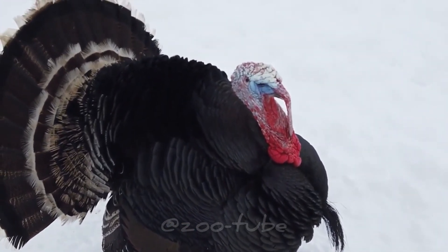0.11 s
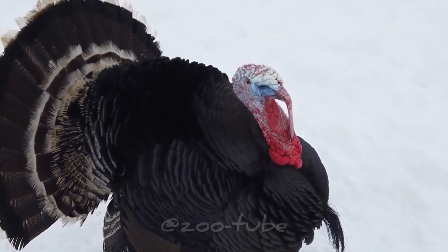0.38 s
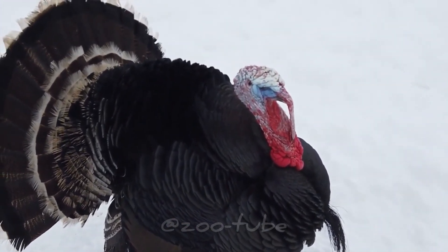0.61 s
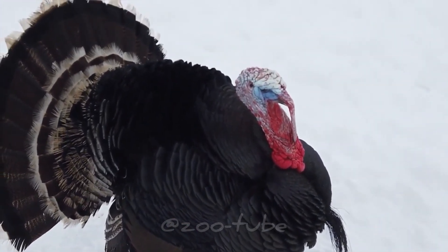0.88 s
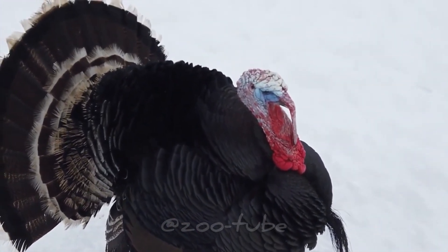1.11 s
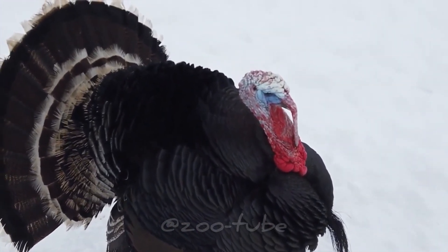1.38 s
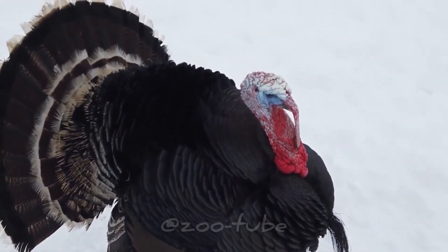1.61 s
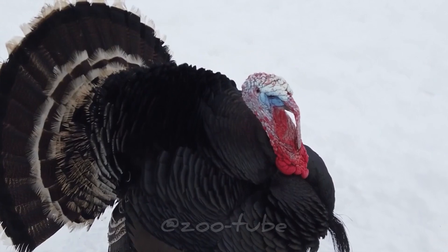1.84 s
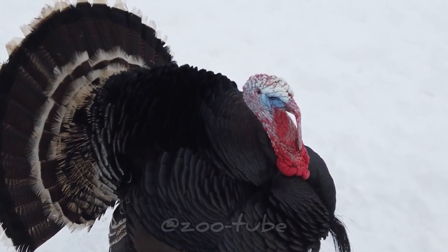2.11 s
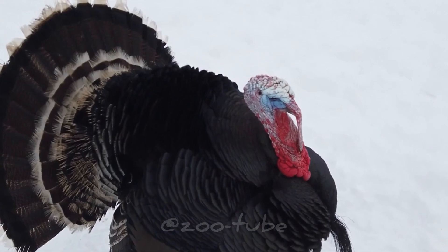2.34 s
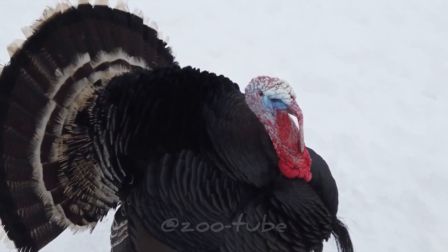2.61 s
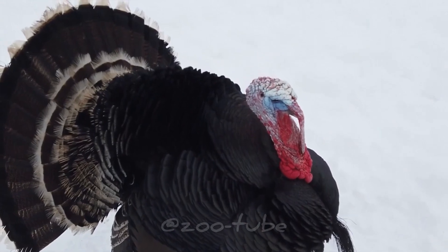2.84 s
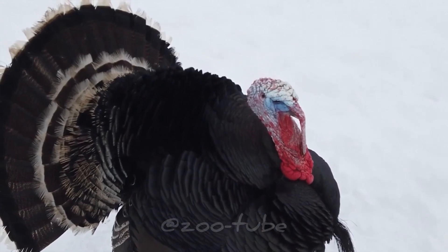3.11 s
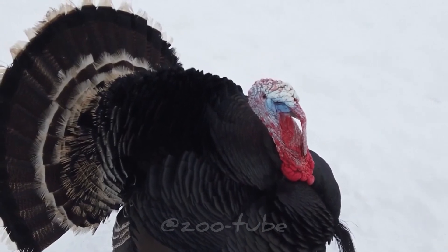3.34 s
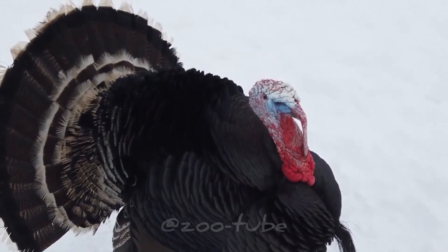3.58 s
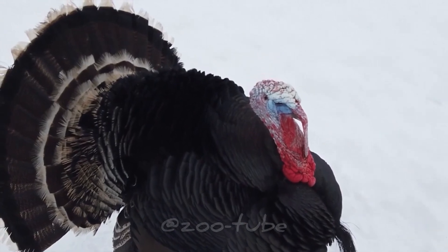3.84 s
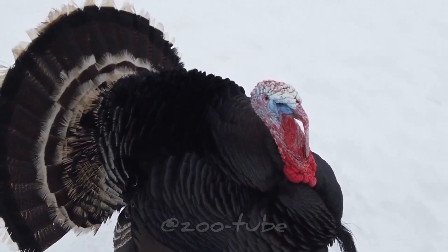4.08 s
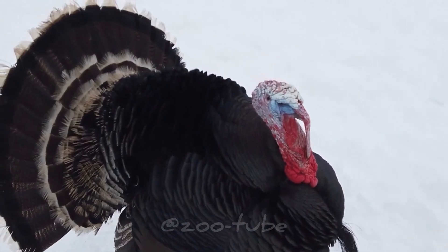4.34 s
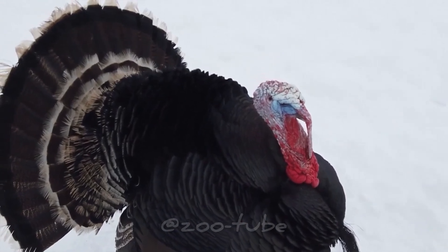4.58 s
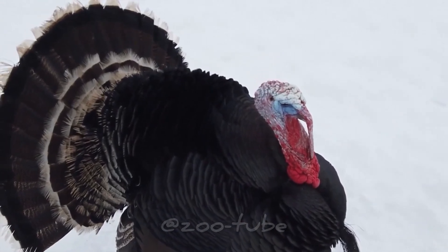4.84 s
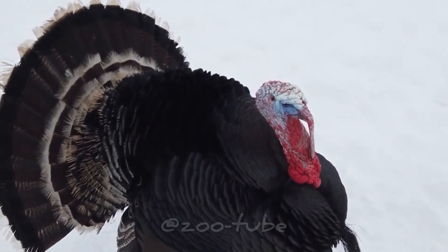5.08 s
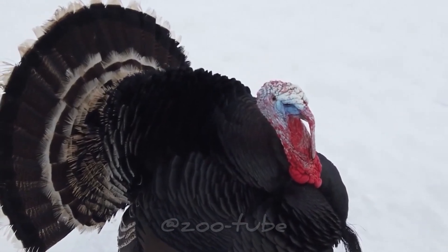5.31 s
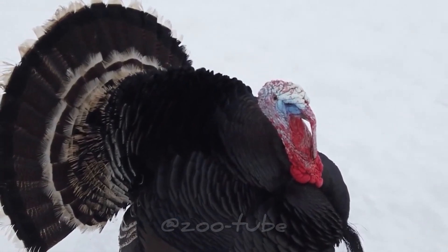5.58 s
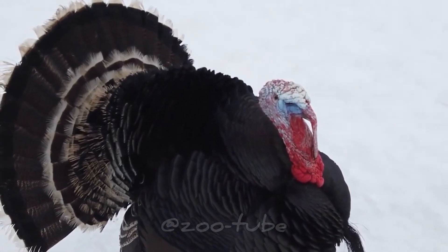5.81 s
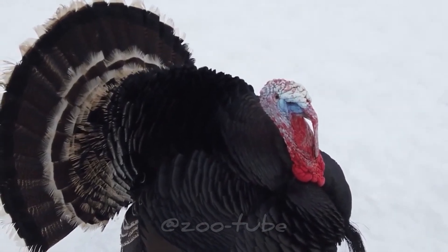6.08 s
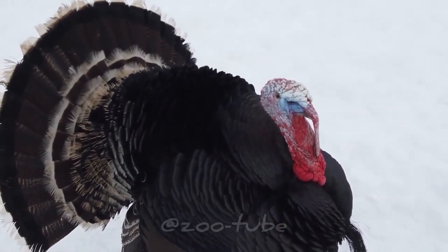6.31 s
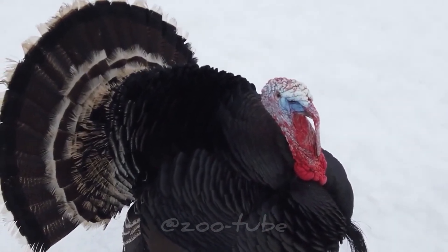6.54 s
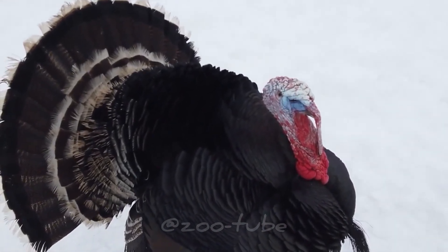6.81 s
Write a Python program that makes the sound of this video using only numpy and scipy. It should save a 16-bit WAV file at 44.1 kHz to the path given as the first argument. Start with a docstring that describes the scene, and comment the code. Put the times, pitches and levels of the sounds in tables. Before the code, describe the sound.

A calm outdoor yard with soft low rumble, light hiss and faint high air swells. From 0 to 1.3 s distant fowl mutter, with a few dull, hoarse clucks standing out. At about 1.4 s a male turkey starts weakly, then bursts into a fast, throaty, bubbling gobble from 1.55 to 2.05 s, somewhat muffled as if turned away, with thin scattered echoes. Faint peeps and far hoarse calls follow at 2.2-3 s. A pigeon's soft hollow coo rises and falls from 3.0 to 3.9 s; over it, at 3.55-4.15 s, comes a second, weaker, raspier gobble. Then quiet, until a hen's short clear peeps at 4.8-5.1 s. Tiny pigeon grunts at 5.3 and 5.7 s lead into another rising coo with faint peeps, around 5.8-6.4 s. At 6.47-6.9 s the third gobble erupts, by far the loudest and brightest, hard rattling notes closing in gulps.

```python
"""Turkeys in a snowy yard. Far fowl mutter and cluck over soft rumble and hiss, then a first gobble breaks out, duller
because the bird faces away. Far calls, peeps and a pigeon's coo follow, and a second gobble sounds during the coo.
A hen peeps and the pigeon grunts before the third gobble. Gobbles are quick runs of short notes and gulps: stacks of
sines from a two-sided voice box, plus rasping noise. Peeps and coos are near sines; the yard is shaped noise."""
import sys
import numpy as np
from scipy import signal
from scipy.fft import rfft, irfft
from scipy.io import wavfile
from scipy.ndimage import uniform_filter1d, minimum_filter1d

SR = 44100
rng = np.random.default_rng(int(sys.argv[2]) if len(sys.argv) > 2 else 0)


def voltage_ratio(decibels):
    """Convert decibels (scalar or array-like) to amplitude ratios, 20 dB per decade."""
    exponent = np.asarray(decibels, float) / 20
    return 10 ** exponent


def put_to_file(sound):
    """Save the sound as 16-bit audio at rate SR, in the file named by the first command-line argument."""
    columns = np.atleast_2d(sound).T  # one column per channel
    safe = np.clip(columns, -1, 1)
    whole_steps = np.round(safe * 32767)
    wavfile.write(sys.argv[1], SR, whole_steps.astype(np.int16))


N = 305613   # length of the scene in samples


def rms_one(x):
    """Scale a sound so that its average strength (rms) is 1."""
    return x / np.sqrt(np.mean(x ** 2) + 1e-20)


def filtered(x, order, hz, kind="low"):
    """Butterworth filter: keeps the lows, or a band between two frequencies."""
    return signal.sosfilt(signal.butter(order, hz, kind, fs=SR, output="sos"), x)


def coloured(spectrum):
    """Noise with the given balance of low and high frequencies, rms 1."""
    hz, level_db = np.transpose(spectrum)
    size = 2 ** 19
    grid = np.maximum(np.fft.rfftfreq(size, 1 / SR), 1)
    gain = voltage_ratio(np.interp(np.log(grid), np.log(hz), level_db))
    return rms_one(irfft(rfft(rng.standard_normal(size)) * gain)[:N])


def wobble(rate_hz):
    """Random wandering no faster than about rate_hz, rms 1."""
    return rms_one(filtered(rng.standard_normal(N), 2, rate_hz))


def over_time(table):
    """Straight lines between the points of a (time, value) table."""
    return np.interp(np.arange(N) / SR, *np.transpose(table))


def add(out, s, piece):
    """Mix a piece in at a time in seconds."""
    i = round(s * SR)
    out[i:i + len(piece)] += piece[:N - i]


def swell(length, edge):
    """Progress through a note (0-1) and its rounded loudness: quick to rise, spilling a little past both ends."""
    t = np.arange(-edge * SR, (length + edge) * SR) / SR
    ramp = np.clip(np.minimum(1.5 * (t + edge), length + edge - t) / (2 * edge), 0, 1)
    lean = voltage_ratio(-5.5 * (2 * t / length - .9) ** 2)   # loudest just before the middle
    return t / length, np.sin(np.pi / 2 * ramp) ** 2 * lean


def gobbler():
    """The near turkey: notes, gulps, swoops and cries with rasping air; also returns the effort behind them."""
    # how hoarse the voice is: (time [s], share of its usual unsteadiness and rasp)
    hoarse_table = [(1.4,1.3),(1.451,0.51),(1.576,0.31),(1.601,1.1),(2.1,1.1),(3.58,1.9),(3.611,0.65),(3.66,1.15),(4.0,1.15),(6.4,0.83)]
    hoarse = over_time(hoarse_table)
    sound, strain = voice(gobble_notes() + gulps() + swoops(), jitter=0.013, flutter_db=6.5,
                          lifted_flutter_db=3.5, rest_db=-8.0, dull_db=6.5, held=0.94, edge=.005,
                          arch=0.038, steady_s=0.016, hoarse=hoarse)
    cry_sound, cry_strain = cries()
    strain = strain + cry_strain
    # air grows faster than effort
    sound = sound + cry_sound + rasp(hoarse * strain ** 1.04, level_db=-11.0)
    turn_s, away_cut_hz = 3, 6300   # until then the gobbler faces away and sounds duller
    dull = filtered(sound, 2, away_cut_hz)
    return np.where(np.arange(N) < turn_s * SR, dull, sound), strain


def gobble_notes():
    """Short notes that drift part of the way toward the voice's resting pitch, less so on high partials."""
    # gobble notes, overlapping where both sides of the voice box sound; the gullet singles out one partial:
    # (time [s], length [s], frequency of that partial [Hz], its level [dB], its number in the stack)
    note_table = [(1.363,0.01,800,-42.5,1),(1.374,0.042,1077,-36.5,1),(1.377,0.036,3370,-32.5,3),
                  (1.468,0.017,820,-38.5,1),(1.516,0.025,800,-34,1),
                  (1.559,0.031,813,-17,1),(1.588,0.016,969,-24.5,1),(1.588,0.023,3423,-27,3),(1.592,0.023,1405,-34,2),
                  (1.608,0.023,2712,-31.5,2),(1.616,0.01,800,-26.5,1),(1.652,0.011,1885,-37,2),(1.668,0.016,1970,-36,3),
                  (1.692,0.011,3060,-28,5),(1.713,0.023,1340,-24.5,1),(1.739,0.017,1318,-25,1),(1.758,0.011,800,-23,1),
                  (1.772,0.024,928,-26.5,1),(1.778,0.015,1382,-17.5,1),(1.782,0.04,3770,-31,4),(1.788,0.051,2966,-40.5,4),
                  (1.813,0.012,800,-30,1),(1.894,0.007,3060,-35,4),(1.903,0.014,3716,-31,5),
                  (1.94,0.035,3144,-33,4),(2.012,0.039,1762,-46,2),(2.05,0.014,1300,-35.5,2),
                  (3.548,0.027,828,-48,1),(3.568,0.03,1400,-35,2),(3.612,0.031,2268,-31,2),(3.649,0.01,1246,-21,1),
                  (3.657,0.023,952,-22,1),(3.663,0.042,1380,-29.5,1),(3.675,0.025,3220,-24.5,3),(3.7,0.017,820,-35,1),
                  (3.722,0.044,2520,-43,3),(3.741,0.025,886,-39.5,1),(3.787,0.021,1271,-29.5,2),(3.812,0.018,1887,-41,2),(3.79,0.015,3194,-33,4),
                  (3.822,0.022,1260,-40,2),(3.86,0.01,1300,-35.5,2),(3.87,0.017,3200,-36.5,4),
                  (3.955,0.031,3715,-42.5,5),(4.014,0.045,697,-42,1),(4.025,0.05,1416,-35.5,2),
                  (4.052,0.0072,2160,-39.5,3),(4.075,0.04,1295,-36,2),(4.1,0.038,3040,-46.5,4),(4.15,0.019,1402,-43,2),
                  (6.468,0.015,1522,-38,2),(6.477,0.02,2053,-22,3),(6.485,0.024,3135,-17,4),(6.485,0.019,1578,-19.5,2),
                  (6.508,0.0069,2548,-16.5,4),(6.508,0.022,574,-30.5,1),(6.525,0.0099,1905,-19,2),(6.535,0.01,1213,-14,2),
                  (6.542,0.01,1645,-14.5,2),(6.544,0.014,824,-16,1),(6.557,0.033,3280,-19,4),(6.567,0.021,2904,-17,3),
                  (6.57,0.0061,885,-8.5,1),(6.604,0.0076,2513,-23.5,3),(6.609,0.0064,1844,-22,2),(6.616,0.019,3350,-22.5,4),
                  (6.625,0.0092,1460,-24.5,2),(6.71,0.02,578,-25,1),(6.738,0.0093,1855,-27,2),
                  (6.75,0.024,3044,-18,4),(6.784,0.0063,3000,-16,4), (6.879,0.014,574,-32.5,1)]
    rest_hz, drift_share = 950, .42
    notes = []
    for s, length, hz, db, order in note_table:
        half_drift = drift_share * (rest_hz - hz / order) / 2 / order
        notes.append((s, length, hz - half_drift, hz + half_drift, db, order))
    return notes


def gulps():
    """The gullet rings, its lower resonance drops and lands, and a second ring sounds around the landing: four notes."""
    # gulps that close a syllable: (time [s], level [dB], ring of the gullet [Hz], length of the drop [s])
    gulp_table = [(1.864,-31.5,3570,0.01),(3.994,-33.5,3018,0.018),(6.654,-14.5,3080,0.016),(6.694,-15.5,3296,0.0092),(6.819,-22,3070,.019),(6.863,-23.5,3100,0.015)]
    lead_s, ring_s = 0.0039, 0.006
    second_s, second_length_s, second_db = 0.011, 0.011, -2
    drop_from_hz, drop_db = 2200, -7.5
    land_s, land_hz, land_db = 0.0094, 1240, 3
    notes = []
    for s, db, ring_hz, drop_s in gulp_table:
        notes += [(s - lead_s, ring_s, ring_hz, ring_hz, db, 5),
                  (s, drop_s, drop_from_hz, land_hz, db + drop_db, 3),
                  (s + drop_s, land_s, land_hz, land_hz, db + land_db, 2),
                  (s + second_s, second_length_s, ring_hz, ring_hz, db + second_db, 5)]
    return notes


def swoops():
    """Gliding notes: low glides carry the first partial, high swoops the second."""
    # notes that glide, and faint quick swoops that link the syllables:
    # (time [s], length [s], start frequency [Hz], end frequency [Hz], level [dB])
    swoop_table = [(1.444,0.035,1240,1015,-34),(1.485,0.034,1297,1120,-26),(1.533,0.028,1260,1316,-21.5),(1.703,0.014,2000,990,-36.5),(1.817,0.028,1550,720,-48),
                   (1.915,0.015,2040,1130,-31.5),(1.994,0.013,906,692,-32),(2.214,0.049,696,1392,-63),
                   (3.565,0.021,936,733,-40),(3.847,0.024,800,1300,-44.5),
                   (3.956,0.023,864,1546,-46),(4.091,0.012,2530,3050,-44),(6.499,0.014,2202,1300,-28),(6.742,0.016,2310,1370,-46),
                   ]
    return [(*row, 1 if max(row[2:4]) < 1400 else 2) for row in swoop_table]


def cries():
    """Held cries: the whole stack of partials bends together, slowly at first."""
    # (time [s], length [s], start [Hz] and end [Hz] of the singled-out partial, level [dB], its number)
    cry_table = [(1.915,0.091,750.5,873,-27.5,1),(3.866,0.071,2570,2795,-36,3),(6.745,.05,1663,1693,-23,2)]
    # a cry as short as arch_s would arch by its whole pitch; longer ones far less
    return voice(cry_table, jitter=0.014, flutter_db=3.0, lifted_flutter_db=0.0, rest_db=-2.0, dull_db=3.5,
                 held=0, edge=.005, arch=0, steady_s=1, arch_s=.018, ease=-0.77)


def peaks_at(hz, modes):
    """Gain of a set of resonances at a frequency: each is strongest at its own peak."""
    return sum(voltage_ratio(db) / (1 + (2 * (hz - top) / width) ** 2) for top, width, db in modes)


def voice(notes, jitter, flutter_db, lifted_flutter_db, rest_db, dull_db, held, edge, arch, steady_s,
          arch_s=0, hoarse=1, ease=0.71, count=14):
    """Gliding stacks of partials shaped by the throat, one lifted; also the effort, greater for high notes."""
    # resonances of the throat and beak: (frequency [Hz], width [Hz], level [dB])
    tract = [(800, 130, -6), (1300, 160, -0.5), (2000, 620, -8), (3234, 500, 1.5), (4300, 5700, -20.5),
             (6485, 70000, -18)]
    out, strain = np.zeros(N), np.zeros(N)
    shake = hoarse * wobble(180)
    flutter = hoarse * np.minimum(rms_one(wobble(190) + wobble(45)), 1.2)
    luck = rng.standard_normal((len(notes), 2 * count))
    order = np.arange(1, count + 1)[:, None]
    for (s, length, start_hz, end_hz, db, lifted), dice in zip(notes, luck):
        u, envelope = swell(length, edge)
        i = (round((s - edge) * SR) + np.arange(len(u))) % N
        glide_hz = start_hz + (end_hz - start_hz) * u * (1 + ease - ease * u)
        hz = glide_hz / round(lifted) * (1 + jitter * shake[i])
        # pitch follows the push of air: up, then down
        hz *= 1 + (arch + (arch_s / length) ** 2) * (.5 - (2 * u - 1) ** 2)
        unsteady = min(1, steady_s / length)   # notes longer than steady_s settle
        gains = peaks_at(order * hz, tract)
        gains = gains * voltage_ratio(rest_db + 6.16 * unsteady * dice[:count, None])   # no two notes alike
        gains *= (length / 0.023) ** held   # held notes are richer
        gains /= 1 + (order * hz / 9000) ** 6   # air takes the top
        flicker_db = flutter_db * unsteady * flutter[(i + 1000 * order) % N]   # each partial flickers alone
        gains *= voltage_ratio(flicker_db - dull_db * np.maximum(order / lifted - 1, 0))
        gains[round(lifted) - 1] = voltage_ratio(lifted_flutter_db * flutter[i])
        phase = order * np.cumsum(2 * np.pi * hz / SR) + 2 * dice[count:, None]
        stack = np.sum(gains * np.sin(phase), axis=0)
        add(out, s - edge, np.sqrt(2) * voltage_ratio(db) * envelope * stack)
        add(strain, s - edge, voltage_ratio(db + 6 * np.log2(start_hz / 2000)) * envelope)
    return out, strain


def rasp(strain, level_db):
    """Turbulent air: noise in irregular puffs that follow the effort."""
    # colour of the rasping air: (frequency [Hz], level per Hz [dB])
    rasp_colour = [(200, -31), (420, -21.5), (800, -4.5), (2280, -7), (3270, 4), (4600, -10), (9000, -29.5),
                   (14000, -60)]
    puffs = voltage_ratio(level_db + 2.8 * wobble(130))
    return puffs * uniform_filter1d(strain, size=360) * coloured(rasp_colour)


def chest_hum(strain):
    """The chest drums under each gobble: low noise that lingers a little after the effort."""
    # colour of the drumming: (frequency [Hz], level per Hz [dB])
    chest_colour = [(25, -51), (45, -24), (85, 6.5), (150, -8.5), (420, -9.5), (1500, -88.5)]
    lingering = uniform_filter1d(strain, size=4000, origin=1500)
    return voltage_ratio(-34.0) * coloured(chest_colour) * lingering


def peeps():
    """Thin wavering whistles with a weak overtone; the higher, the more broken."""
    # peeps and chirps: (time [s], length [s], frequency [Hz], level [dB])
    peep_table = [(0.586,0.072,628,-63),(2.239,0.07,1754,-61.5),(2.505,0.018,3670,-63),(2.522,0.041,3320,-63),(2.569,0.018,3530,-68),
                  (4.608,0.2,963,-69.5),(4.773,0.089,1717,-61),(4.818,0.065,1392,-38.5),(4.953,0.013,1410,-33),
                  (5.004,0.018,1430,-32),(5.07,.006,1910,-54),(4.995,0.04,3390,-65.5),(5.066,0.011,1468,-34),(5.804,0.14,3330,-76.5),(5.32,0.069,710,-62.5),(5.525,0.0357,680,-62.5),
                  (5.81,0.093,1638,-56),(5.967,0.017,1440,-53.5),(6.023,0.029,1435,-44),(6.082,0.048,3450,-77.5),(6.097,0.0055,1790,-46.5),
                  (6.321,0.096,620,-57.5)]
    chirp_under_s, flick_share, sag_share = .035, 0.16, .04   # shorter ones flick upward, longer ones sag
    out, waver, crack = np.zeros(N), wobble(67), wobble(118)
    for s, length, mid_hz, db in peep_table:
        u, envelope = swell(length, 0.0055)
        i = round(s * SR)
        if length < chirp_under_s:
            glide = flick_share * (np.abs(u) ** 3 - .25)
        else:
            glide = -sag_share * (u - .5)
        hz = mid_hz * (1 + glide) * (1 + 0.016 * waver[i:][:len(u)])
        phase = np.cumsum(2 * np.pi * hz / SR)
        tone = np.sin(phase) + voltage_ratio(-34.5) * np.sin(2 * phase)
        level = voltage_ratio(db + 1.43 * (mid_hz / 1400) ** 2 * crack[i:][:len(u)])
        add(out, s - .004, np.sqrt(2) * level * envelope * tone)
    return out


def pigeon():
    """Coos and grunts: a soft hollow tone that wavers and throbs, with a faint octave; higher is softer."""
    # (level at the reference pitch [dB], pitch curve [(time [s], pitch [Hz])])
    coo_table = [(-52.5, [(3.04,221),(3.12,260.7),(3.2,298.3),(3.28,413.7),(3.42,453),(3.82,420),(3.92,234)]),
                 (-57.5, [(5.29,197.8),(5.34,200)]), (-58, [(5.69,201.4),(5.745,195.5)]),
                 (-53, [(5.79,226),(5.87,240),(6.0,326.5),(6.1,421.6),(6.3,472)]),
                 (-50.5, [(6.32,351),(6.45,258)])]
    reference_hz, loss_db_per_octave = 230, 11
    out, throb, waver = np.zeros(N), wobble(45.57), wobble(25)
    for db, rows in coo_table:
        s, hz = np.transpose(rows)
        i = np.arange(round(s[0] * SR), round(s[-1] * SR))
        hz = np.interp(i / SR, s, hz)
        phase = np.cumsum(2 * np.pi * hz * (1 + 0.0062 * waver[i]) / SR)
        fade = np.clip(np.minimum(i - i[0], i[-1] - i) / (0.0085 * SR), 0, 1)
        level = voltage_ratio(db - loss_db_per_octave * np.log2(hz / reference_hz))
        out[i] = np.sqrt(2) * level * fade * (np.sin(phase) + voltage_ratio(-22.5) * np.sin(2 * phase))
    return out * voltage_ratio(2.6 * throb)


def far_fowl():
    """Far hoarse calls: steady notes with rasp, their top taken by distance."""
    # (time [s], length [s], frequency of the lifted partial [Hz], its level [dB],
    #  its number in the stack, rounded for the pitch; the fraction only sets how fast higher partials fade)
    call_table = [(1.195,0.13,833,-68.5,1.6),(2.755,0.11,800,-71.5,3.1),(2.8,0.079,945,-69,3),(2.87,0.2,1180,-62.5,2.54),
                  (3.18,0.041,3675,-74.5,8.2),(2.89,.14,1998,-79,5.5),(3.25,0.14,2177,-80,6),(3.413,0.5,2310,-77,8.2),(6.25,0.064,866,-60,3.45),
                  (6.3,0.12,2230,-72,4.53)]
    notes = [(s, length, hz, hz, db, order) for s, length, hz, db, order in call_table]
    calls, strain = voice(notes, jitter=0.03, flutter_db=4.0, lifted_flutter_db=6, rest_db=-0.5, dull_db=3.0,
                          held=0, edge=.015, arch=.05, steady_s=1)
    return filtered(calls + rasp(strain, level_db=-10.5), 6, 4700)


def echoes(x):
    """Scattered thin returns from sheds and fences: a fading burst of noise smears the sound."""
    t60_s, level_db, low_hz, cut_hz = 0.51, -20, 1600, 5500
    t = np.arange(SR // 2) / SR
    fading = voltage_ratio(2.0 * wobble(40)[SR:][:len(t)] - 60 * t / t60_s)
    tail = rng.standard_normal(len(t)) * fading * np.clip(t / 0.0026, 0, 1)
    tail = filtered(tail, 2, [low_hz, cut_hz], "band")
    return voltage_ratio(level_db) * signal.fftconvolve(x, tail / np.sqrt(np.sum(tail ** 2)))[:N]


def clucks():
    """Short hoarse puffs of low noise."""
    # single low clucks standing out: (time [s], level [dB])
    cluck_table = [(0.45, -58.5), (0.791, -62), (0.935, -63), (1.074, -56.5), (1.244, -55)]
    # their colour: (frequency [Hz], level per Hz [dB])
    cluck_colour = [(200,-22),(350,16),(650,18),(1000,-10),(1400,-19)]
    gate = np.zeros(N)
    for s, db in cluck_table:
        add(gate, s, voltage_ratio(db) * swell(0.0256, 0.00062)[1])
    return gate * coloured(cluck_colour)


def muttering():
    """The far flock's low clucks: noise swelling in patches inside narrow bands."""
    # loudness of the far flock: (time [s], level [dB])
    mutter_table = [(0,-63.5),(1.298,-69),(2.602,-73),(3.205,-70.5),(4.799,-70.5),(6.199,-68)]
    out = 0
    for hz in np.geomspace(270, 950, 9):
        band = filtered(rng.standard_normal(N), 2, [hz * .92, hz * 1.08], "band")
        out = out + rms_one(band) * voltage_ratio(5 * wobble(9) - 4 * np.log2(hz / 300))   # higher bands are softer
    return voltage_ratio(over_time(mutter_table)) * rms_one(out)


def rumble():
    """Soft steady low noise."""
    # (frequency [Hz], level per Hz [dB])
    rumble_colour = [(25, -34.5), (70, 0.5), (177, -0.5), (380, -8.5), (900, -80.5)]
    return voltage_ratio(-67.5) * coloured(rumble_colour)


def hiss():
    """Soft steady noise reaching into the treble."""
    # (frequency [Hz], level per Hz [dB])
    hiss_colour = [(410, -37.5), (700, -8.5), (1520, -8.5), (8410, -15), (15500, -23)]
    return voltage_ratio(-73.5) * coloured(hiss_colour)


def air_swells():
    """A thin high hiss that comes and goes in smooth swells."""
    # middle of each swell: (time [s])
    swell_times = [2.622, 3.32, 4.05, 4.9, 5.57, 6.301]
    # colour of the hiss: (frequency [Hz], level per Hz [dB])
    air_colour = [(3000, -28), (7000, -0.5), (15500, -3)]
    spread_s, level_db = .17, -76.5
    t = np.arange(N) / SR
    loudness = sum(np.exp(-((t - s) / spread_s) ** 2) for s in swell_times)
    return voltage_ratio(level_db) * loudness * coloured(air_colour)


def scene():
    """Birds with their echoes over the yard."""
    gobbles, strain = gobbler()
    birds = gobbles + far_fowl() + peeps()
    yard = rumble() + muttering() + clucks() + hiss() + air_swells()
    return (birds + echoes(birds) + pigeon() + chest_hum(strain) + yard)[None]


def top_cut(x):
    """Nothing passes above the cut-off."""
    return signal.sosfilt(signal.butter(12, 15610, fs=SR, output="sos"), x)


def record(dry):
    """A quick limiter eases the loudest peaks down."""
    gain = minimum_filter1d(1 / np.sqrt(1 + (dry / 0.38) ** 2), size=200, axis=1)
    smooth_gain = uniform_filter1d(gain, size=200, axis=1)
    return top_cut(dry * smooth_gain)


dry = scene()
out = record(dry)
put_to_file(out)
```